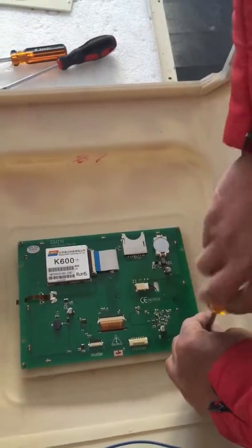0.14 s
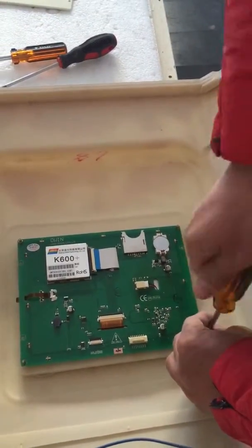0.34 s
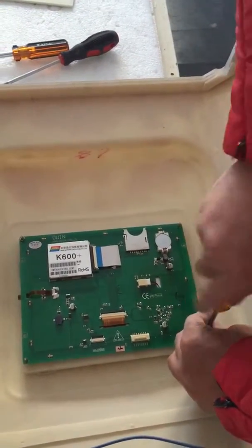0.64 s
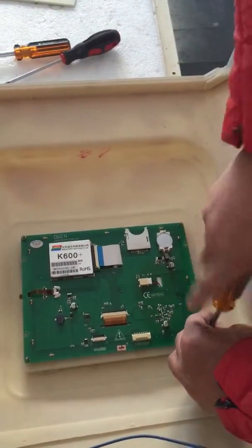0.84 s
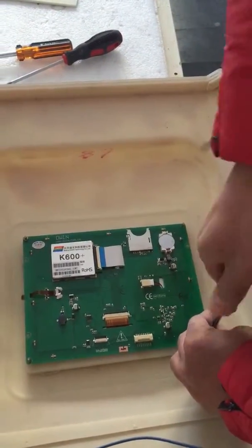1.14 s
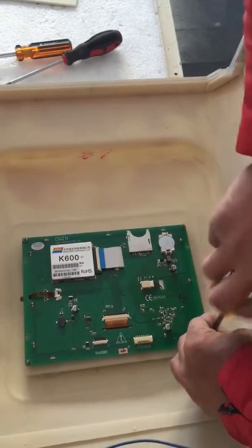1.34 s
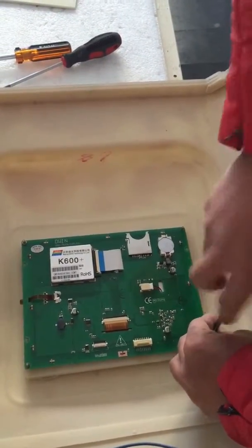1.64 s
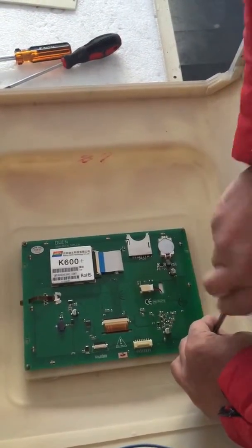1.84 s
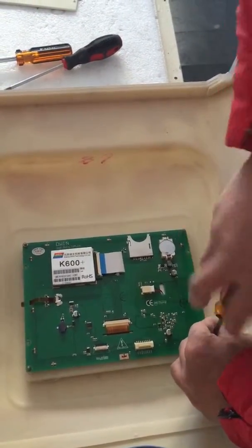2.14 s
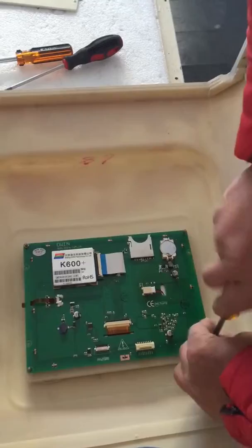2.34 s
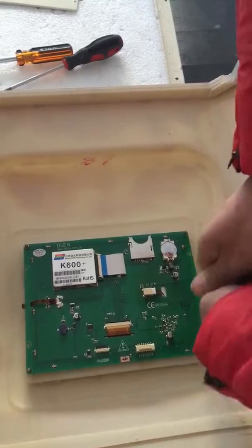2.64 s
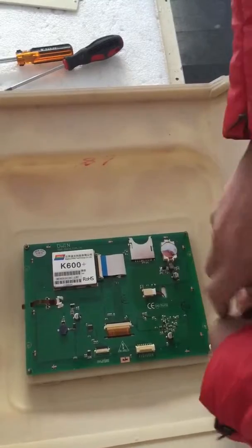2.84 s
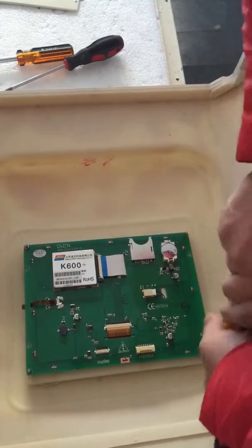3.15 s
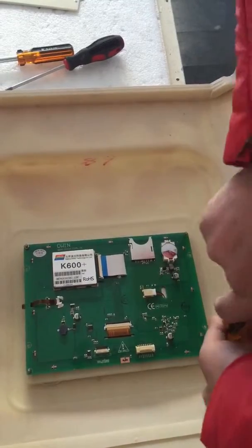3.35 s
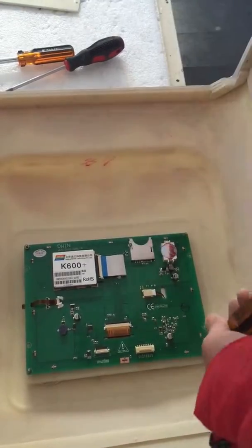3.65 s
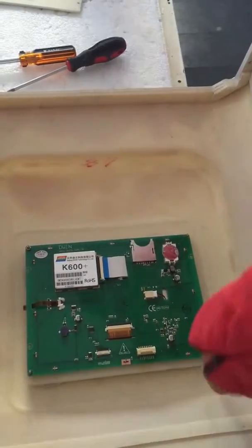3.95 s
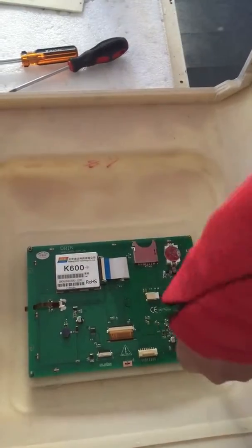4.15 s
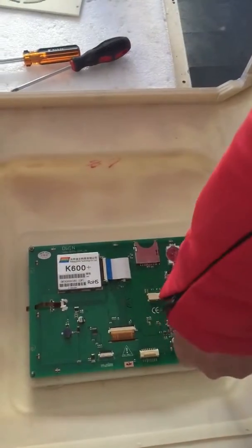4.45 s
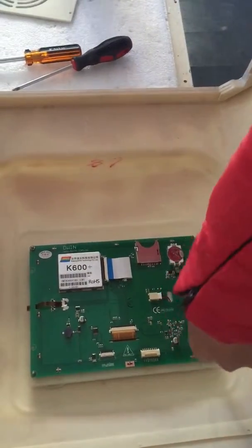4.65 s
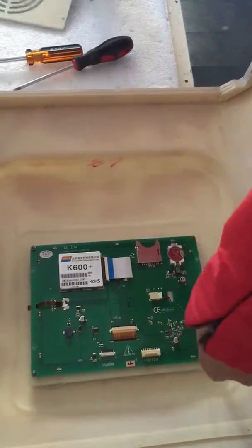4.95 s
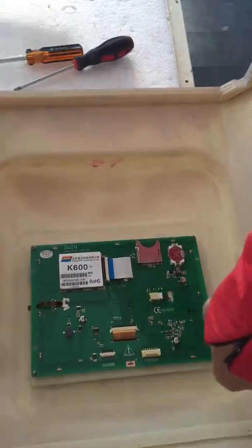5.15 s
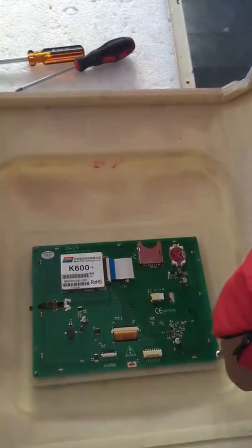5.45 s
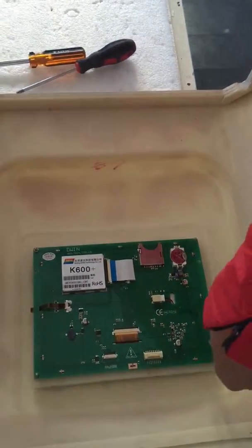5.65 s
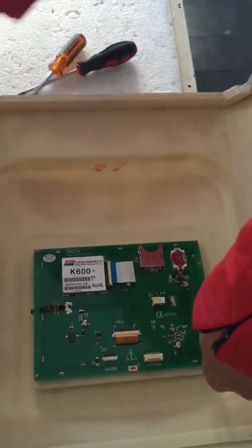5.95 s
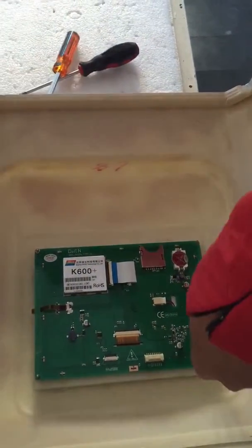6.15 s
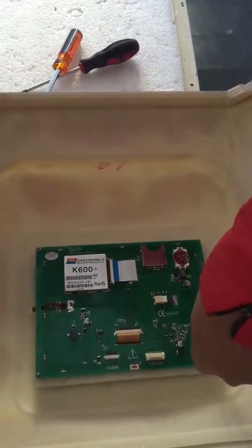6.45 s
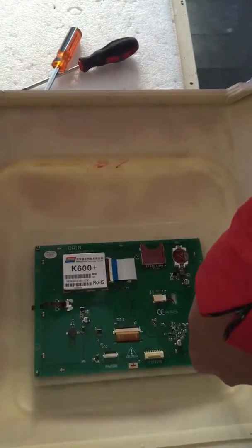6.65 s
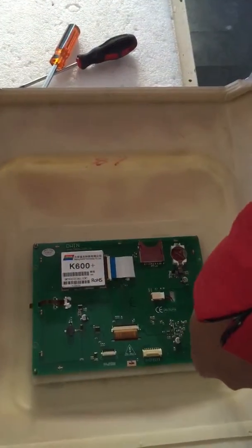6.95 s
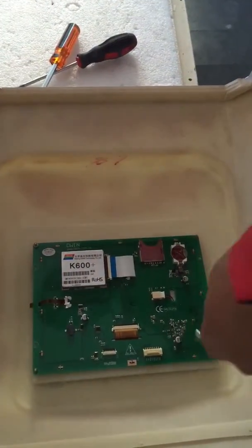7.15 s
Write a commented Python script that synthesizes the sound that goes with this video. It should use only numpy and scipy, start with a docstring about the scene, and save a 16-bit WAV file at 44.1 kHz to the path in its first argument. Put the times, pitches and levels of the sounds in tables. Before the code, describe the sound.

Dry, grainy finger strokes and tiny steel ticks come first, with soft rocking of a board in a hollow plastic tray, building to a loud knock. Cloth swishes follow, with a quick rising zip and small scrapes. A nudged tin rings and is stilled, heavy thuds shake the table, screwdrivers clink brightly, then quiet until a plastic handle is set down. Close microphone, small hard room, faint hiss.

```python
"""Fingers rub and roll a nut driver, made from noise full of tiny catches, while its socket ticks in short noise snaps.
Soon the board rocks and knocks on its plastic tray, as ringing tones and chatter, and the nut squeaks faintly.
Then a nylon sleeve swishes and zips over the tray's rim, something small scrapes, and the arm thuds on the table.
A nudged tin rings, harder thuds and ticks follow, steel tools clink, and at last a plastic handle clacks down.
All of it sits in a small hard room, over a faint steady rush of filtered noise."""
import sys
import numpy as np
from scipy import signal
from scipy.fft import rfft, irfft, next_fast_len
from scipy.io import wavfile
from scipy.ndimage import uniform_filter1d

SR = 44100
rng = np.random.default_rng(int(sys.argv[2]) if len(sys.argv) > 2 else 0)


def generate_wav(sig):
    """Save sig (samples, or channels by samples) to the path in sys.argv[1] as 16-bit PCM at SR."""
    pcm = np.round(np.clip(np.atleast_2d(sig).T, -1, 1) * 32767).astype(np.int16)
    wavfile.write(sys.argv[1], SR, pcm)


N = 321489
T = np.arange(SR // 2) / SR  # seconds since a contact, for half a second

# Levels in the tables are starting levels: the functions and the room shift them further.
# Tone colour of fingers rubbing the driver. Each row: frequency in Hz, level in dB.
FINGER_COLOUR = [(350, -28.5), (600, -4), (773, 2), (833, -4.5), (1140, 3.5), (1410, -0.5), (2220, 1.5),
                 (3890, -7.5), (4240, -6), (4810, -15.5), (7500, -22.5), (9750, -43), (16500, -120)]
# Tone colour of the tray rumbling under the fingers. Each row: frequency in Hz, level in dB.
TRAY_RUMBLE = [(40, -35.5), (90, -8.5), (140, -1), (200, -2), (300, 5.5), (400, -6), (550, 0.5), (700, -8),
               (1100, -38)]
# Tone colour of the hiss of a sliding contact. Each row: frequency in Hz, level in dB.
NYLON_HISS = [(3000, -27), (4500, 1), (5500, 0.5), (8000, -2.5), (10000, -4), (13000, -5), (16000, -10.5)]
# The fingers roll the driver or a part. Each row: time of the peak in seconds, length in seconds, level in dB.
TURNS = [(0, 0.2, -53), (0.26, 0.28, -53), (0.367, 0.12, -44.5), (0.49, 0.024, -49.5), (0.748, 0.14, -46),
         (0.823, 0.025, -45), (.885, 0.046, -45.5), (0.994, 0.11, -54.5), (1.158, 0.065, -40),
         (1.215, 0.071, -48.5), (1.531, 0.054, -53), (1.65, 0.084, -61), (1.897, 0.093, -51),
         (1.987, 0.14, -49.5), (2.405, 0.15, -55), (2.57, 0.12, -34), (3.142, 0.094, -49.5),
         (6.277, 0.14, -50.5), (7.064, 0.074, -51), (7.189, 0.24, -42.5)]
# Short strokes with a sharp start; the one at 2.86 is the tray rumbling on after the knocks.
# Each row: time of the peak in seconds, level in dB, hiss in dB against that level.
SHORT_STROKES = [(.075, -45, -10), (1.059, -42, -4.5), (1.154, -43, -1), (2.251, -44.5, 0),
                 (2.493, -43.5, -8), (2.584, -38.5, 0.5), (2.86, -56.5, -1.5), (6.653, -56, -13)]
TURN_RISE = 0.45  # share of a turn spent swelling
STROKE_RISE_S, STROKE_FALL_S = 0.0083, 0.043
# Pressing harder adds hiss and rumble: dB against the rub at a usual touch, and dB gained per dB of rub
USUAL_DB, HISS_DB, HISS_GROWS, RUMBLE_DB, RUMBLE_GROWS = -53.5, -14.5, 0.98, -3.5, 0.99

# Tone colour of the sleeve's cloth. Each row: frequency in Hz, level in dB.
CLOTH_COLOUR = [(350, -23.5), (600, -5), (1110, -2.5), (1310, -4.5), (1880, 3.5), (3120, -2), (3810, -3.5),
                (5070, -13), (5820, -9), (7500, -20), (9750, -44.5), (16500, -120)]
# Tone colour of the tray rumbling under the arm. Each row: frequency in Hz, level in dB.
RIM_RUMBLE = [(25, -28), (50, 3.5), (90, -3.5), (160, -6.5), (300, -8), (420, -10.5), (650, -16.5),
              (1100, -27.5)]
# Drags of the sleeve over the tray's rim, one curve each.
# Each row of a curve: time in seconds, level of the rub in dB, level of the hiss in dB.
DRAGS = [
    [(3.44, -68, -73), (3.454, -75, -76), (3.49, -59, -64), (3.6, -43.5, -37), (3.646, -40.5, -44),
     (3.668, -51.5, -61), (3.766, -59.5, -73), (3.844, -50, -59), (3.85, -52, -48.5), (3.922, -74, -81),
     (3.95, -58, -78)],
    [(4.14, -52, -67), (4.166, -77, -72), (4.176, -50, -63), (4.242, -47, -49.5), (4.434, -51, -62),
     (4.512, -64.5, -65), (4.522, -50, -52), (4.558, -60, -63.5), (4.646, -50.5, -52), (4.738, -78, -84),
     (4.77, -72, -79)],
    [(4.78, -83, -89), (4.796, -56.5, -69), (4.812, -63.5, -78), (4.852, -45, -51.5), (4.886, -57, -63),
     (4.932, -47, -48), (4.976, -57, -64), (5.004, -44, -44.5), (5.222, -73, -70.5), (5.296, -53.5, -78),
     (5.44, -50.5, -60)],
    [(5.69, -65, -97), (5.704, -51, -46), (5.742, -42, -42.5), (5.756, -49.5, -48), (5.786, -51, -54),
     (5.796, -45, -47), (5.844, -54.5, -56), (5.922, -48, -55), (5.94, -41, -47), (6.01, -48, -55.5),
     (6.02, -43, -44)],
    [(6.05, -44, -52), (6.074, -51, -51.5), (6.088, -42.5, -47), (6.102, -48, -49), (6.122, -55, -55),
     (6.202, -58.5, -66), (6.272, -55, -77), (6.36, -64, -73), (6.412, -55, -58.5), (6.576, -72.5, -79),
     (6.62, -80, -85.5)],
]
CLOTH_DB, NYLON_DB = 1, 0.5  # added to the rub and the hiss of every drag
RIM_DB, RIM_GROWS = -7, 0.54  # rim rumble against the rub at a usual touch, and dB gained per dB of rub

# The weave zips, mostly higher as the sleeve speeds up. Each row: time in seconds, pitch in Hz, level in dB.
ZIP = [(3.53, 3270, -70), (3.575, 3496, -46), (3.61, 3820, -37), (3.635, 4780, -43), (3.675, 4500, -66)]
# Something small scrapes along the table. Each row: time in seconds, pitch in Hz, level in dB.
SCRAPE = [(4.4, 900, -68), (4.437, 970, -47), (4.455, 1050, -54), (4.512, 1100, -55), (4.527, 1230, -45),
          (4.55, 1400, -56), (4.68, 1050, -68)]
# The nut squeaks faintly in its thread. Each row: time in seconds, pitch in Hz, level in dB.
SQUEAK = [(2.15, 2100, -74), (2.2, 2120, -59), (2.24, 2125, -67)]

# The board knocks on the tray.
# Each row: start in seconds, level in dB, crack in dB against that level, cut-off of the contact in Hz.
KNOCKS = [(1.467, -37.5, -8.5, 3000), (1.751, -29, -25, 1300), (2.010, -35.5, -1.5, 6000),
          (2.481, -30.5, -4, 4000), (2.532, -23.5, -11.5, 3000), (2.6702, -10, -17, 4570),
          (2.769, -13, -20.5, 3500)]
# Ringing tones of the board. Each row: frequency in Hz, width in Hz before the extra fade, level in dB.
BOARD = [(665, 120, -12.5), (1285, 73, -2), (1400, 21, -27.5), (1650, 21, -12.5), (1875, 53, -1),
         (2300, 25, -22), (2480, 29, -11), (2760, 75, -7.5), (3396, 73, -14.5), (3910, 87, -18)]
# Tone colour of the board's chatter. Each row: frequency in Hz, level in dB.
CHATTER = [(100, -42.5), (400, 0), (650, -9), (1250, 5), (1900, -6), (3000, -13.5), (5000, -25), (9000, -46.5)]
# Tone colour of a crack. Each row: frequency in Hz, level in dB.
CRACK = [(100, -55.5), (400, -21.5), (1000, 5), (2500, 5), (5000, 1.5), (9000, -10), (13000, -17),
         (16000, -13)]
# Ringing tones of the tray. Each row: frequency in Hz, level in dB, time to fall 60 dB in seconds.
TRAY = [(131.3, -12.5, 0.27), (260, 10, 0.077), (290, -2.5, 0.097), (320.3, -7, 0.46), (540, -13, 0.11)]
SHUDDER_DB, SHUDDER_T60 = -28, 0.53  # the tray shudders on: dB against a knock, seconds to fall 60 dB

# The board rocks on the tray as the nut is turned. Each row: start in seconds, level in dB.
ROCKS = [(1.440, -35.5), (1.843, -33.5), (1.93, -39.5), (2.142, -43.5), (2.316, -36.5), (2.394, -32.5),
         (3.14, -40), (4.91, -38)]
ROCK_HZ, ROCK_T60 = 533, 0.053  # pitch, and base decay time in seconds that swing() scales
ROCK_TAP_DB = -6  # rocking hardly taps: the board never leaves the tray
# Soft bumps on the tray, the last one from the handle set down.
# Each row: start in seconds, level in dB, pitch in Hz.
BUMPS = [(.390, -30.5, 290), (.645, -35.5, 313), (1.431, -31.5, 225), (2.531, -31, 218),
         (3.655, -32.5, 151), (7.09, -29.5, 298)]
# The arm thuds on the table. Each row: start in seconds, level in dB, pitch in Hz.
THUDS = [(4.705, -41, 124), (4.819, -36, 125), (5.018, -42, 76), (5.707, -18, 169), (5.945, -15.5, 175),
         (5.989, -14, 293), (6.001, -17, 250), (6.051, -23.5, 262)]
BUMP_CYCLES = 8.9  # base decay time counted in swings, scaled in swing()
BUMP_SHUDDER_DB, THUD_SHUDDER_DB = -15.5, -30  # the tray shudders less when the blow lands beside it
TABLE_DB, TABLE_HZ, TABLE_T60 = -20, 115, 0.65  # the table top drones on after a thud

# Small steel contacts of socket, nut and screws.
# Each row: start in seconds, level in dB, mid-range in dB against the bright snap.
TICKS = [(.3446, -39, -1), (1.0685, -37, 2.5), (1.434, -33, -28), (1.8374, -40, -2), (1.8645, -43, -18),
         (2.1394, -45.5, -2.5), (2.3903, -38, -2), (2.4794, -36, -13), (2.7607, -36, 7),
         (3.8497, -33, -3.5), (4.121, -45, 6), (4.522, -38, -3), (5.7035, -21.5, -4.5), (5.756, -29, -2),
         (5.7928, -25, -26), (5.8054, -26, -11), (5.872, -33, -4), (6.651, -49.5, 4.5),
         (7.0853, -24.5, -2.5)]
# Tone colour of the bright snap. Each row: frequency in Hz, level in dB.
SNAP = [(2000, -34), (5000, -8), (8000, -3), (11500, 1.5), (16000, -7)]
# Tone colour of the part rattling beneath. Each row: frequency in Hz, level in dB.
PART = [(300, -34), (1000, -5.5), (2200, 0.5), (4000, -6.5), (8000, -16), (16000, -31)]

# Steel tools touch. Each row: start in seconds, level in dB, brightness in dB per octave.
CLINKS = [(6.031, -14, -11), (6.035, -11, 2), (6.096, -23, -5)]
# Ringing tones of the steel. Each row: frequency in Hz, level in dB, time to fall 60 dB in seconds
# (before the contact's own damping).
STEEL = [(3425, -7.5, .16), (4660, -22, .15), (5090, -4, 0.44), (5530, -1.5, 0.36), (7950, 8, 0.16),
         (8930, -2.5, 0.17), (11640, 1.5, 0.11), (11700, -15.5, .16)]
# Tone colour of the crack of steel. Each row: frequency in Hz, level in dB.
STEEL_CRACK = [(1000, -9), (3400, -5.5), (6500, -15.5), (8200, -5.5), (10000, -17), (11500, -4.5), (16000, -24)]
# Ringing tones of the parts tin. Each row: frequency in Hz, level in dB, time to fall 60 dB in seconds
# (before the hand stills it).
TIN = [(900, -11, .3), (1060, -5.5, 0.5), (1157, -7, 0.63), (1250, 6.5, 0.85), (1250, -9.5, 0.42),
       (1418, -5, .3), (2900, -8.5, 0.67), (3113, 4, 0.31), (3680, -11.5, 0.29), (4177, -24, .22)]
TIN_S, TIN_DB = 5.455, -25  # when the tin is nudged, and its level
TIN_DAMP_S = 0.16  # the hand closes on the tin and stills it
TIN_THUD_DB, TIN_THUD_HZ, TIN_THUD_T60 = -34, 130, 0.77  # the tin shakes the table; swing() scales the time
# Ringing tones of the plastic handle. Each row: frequency in Hz, level in dB, time to fall 60 dB in seconds.
HANDLE = [(560, -1, 0.12), (780, -8, 0.11), (1376, -3, 0.094), (1470, 1, 0.1), (1780, 1.5, 0.099),
          (1900, -14, 0.064), (2240, -15, .08), (3300, -19, .07), (3540, 2.5, 0.069), (5140, -8, 0.052)]
HANDLE_S, HANDLE_LEVEL_DB = 7.086, -17.5  # when the handle is set down, and its level

# How long the room rings. Each row: frequency in Hz, time to fall 60 dB in seconds.
ROOM = [(100, 0.91), (350, 0.46), (1200, 0.46), (4000, 0.28), (14000, 0.2)]
# Tone colour of the quiet rush. Each row: frequency in Hz, level in dB.
QUIET = [(15, -36.5), (25, 2), (127, 0.5), (476, -15), (560, -7), (641, -13), (1020, -12.5), (2410, -16.5),
         (4870, -23), (6380, -23), (10400, -28), (14400, -28.5), (16000, -34.5)]
TOP_HZ = 16000  # band limit of the microphone


def rubbing():
    """Fingers on the driver, the sleeve on the tray, and three slides that catch into a hoarse tone."""
    slides = rasp(ZIP, width_hz=380) + rasp(SCRAPE, width_hz=300) + rasp(SQUEAK, width_hz=90)
    return fingers() + sleeve() + slides


def fingers():
    """Rumble and the hiss of turns follow how hard the fingers press; each short stroke has its own hiss."""
    turns = [db + swell(s, TURN_RISE * length, (1 - TURN_RISE) * length) for s, length, db in TURNS]
    strokes = [db + swell(s, STROKE_RISE_S, STROKE_FALL_S) for s, db, _ in SHORT_STROKES]
    stroke_hiss = together([level + hiss_db for level, (_, _, hiss_db) in zip(strokes, SHORT_STROKES)])
    turn_hiss = follows(together(turns), HISS_DB, HISS_GROWS)
    rub = together(turns + strokes)
    rumble = follows(rub, RUMBLE_DB, RUMBLE_GROWS)
    return contact(rub, np.hypot(turn_hiss, stroke_hiss), rumble, FINGER_COLOUR, TRAY_RUMBLE)


def sleeve():
    """The sleeve drags on and on as the arm moves; the rim rumbles more under a harder drag."""
    seconds = np.arange(N) / SR
    rub, nylon = np.zeros(N), np.zeros(N)
    for drag in DRAGS:
        s, rub_db, hiss_db = np.transpose(drag)
        rub += amp(np.interp(seconds, s, rub_db, left=-200, right=-200) + CLOTH_DB)
        nylon += amp(np.interp(seconds, s, hiss_db, left=-200, right=-200) + NYLON_DB)
    return contact(rub, nylon, follows(rub, RIM_DB, RIM_GROWS), CLOTH_COLOUR, RIM_RUMBLE)


def contact(rub, nylon, rumble, rub_spectrum, rumble_spectrum):
    """A sliding contact rubs, hisses and shakes the tray."""
    rub_sound = rub * friction(rub_spectrum, grain_db=2.0, flutter_db=1.6)
    hiss_sound = nylon * friction(NYLON_HISS, grain_db=3.0, flutter_db=1.86)
    rumble_sound = rumble * friction(rumble_spectrum, grain_db=1.5, flutter_db=1.4)
    return rub_sound + hiss_sound + rumble_sound


def friction(spectrum, grain_db, flutter_db):
    """Countless tiny catches of uneven size, in clumps; their colour shifts as the contact point moves."""
    catches = rng.standard_normal(N) * amp(grain_db * wobble(1500) + flutter_db * wobble(70))
    z = signal.stft(catches, nperseg=512)[2]
    # a smooth random map over pitch and time lifts and dips the colour
    smooth_pitch = uniform_filter1d(rng.standard_normal(z.shape), size=5, axis=0)
    colour_map = unit(uniform_filter1d(smooth_pitch, size=11, axis=1))
    shifting = signal.istft(z * amp(2.3 * colour_map), nperseg=512)[1][:N]
    return coloured(shifting, spectrum)


def rasp(track, width_hz):
    """Nearly regular catches make a hoarse, broken tone whose pitch follows the sliding speed."""
    seconds = np.arange(N) / SR
    s, track_hz, track_db = np.transpose(track)
    hz = np.interp(seconds, s, track_hz, left=-120, right=-120)  # pitch outside the track is all but inaudible
    db = np.interp(seconds, s, track_db, left=-120, right=-120)
    phase = 2 * np.pi * np.cumsum(hz + width_hz / 2 * wobble(width_hz)) / SR
    return amp(db) * unit(wobble(width_hz) * amp(3 * wobble(60)) * np.sin(phase))


def swell(s, rise, fall):
    """Level of one stroke in dB: it climbs 10 dB in the rise time and drops 10 dB in the fall time."""
    t = np.arange(0, N, 128) / SR - s
    return -10 * ((np.maximum(-t, 0) / rise) ** 1.57 + (np.maximum(t, 0) / fall) ** 0.97)


def together(levels_db):
    """The joint gain of overlapping strokes, one value per sample."""
    gain = np.sqrt(np.sum(amp(levels_db) ** 2, axis=0))
    return np.interp(np.arange(N), np.arange(0, N, 128), gain)


def follows(rub, db, grows):
    """Gain of a layer that lies at db against the rub for a usual touch and grows with it."""
    return amp(USUAL_DB + db) * (rub / amp(USUAL_DB)) ** grows


def knocks():
    """The stiff board answers at once and chatters; the soft tray follows a moment later."""
    out = np.zeros(N)
    for s, db, crack_db, contact_hz in KNOCKS:
        modes = blow(filtered(1.0 * (T == 0), board_response) * fade(0.49))
        chatter = blow(coloured(hiss(), CHATTER) * (fade(0.061) + 0.099 * fade(0.16)))
        # a padded contact lasts longer and leaves the upper modes still
        b, a = signal.butter(2, contact_hz, fs=SR)
        body = signal.lfilter(b, a, amp(-5.5) * modes + amp(-3) * chatter)
        crack = amp(crack_db) * blow(coloured(hiss(), CRACK) * fade(0.024))
        tray = ring(TRAY, blur_hz=1.6) * (1 - fade(0.013)) ** 2
        add(out, s, amp(db) * (body + crack))
        add(out, s + 0.003, amp(db - 5.5) * tray)
        add(out, s, amp(db + SHUDDER_DB) * shudder())
    return out


def board_response(f):
    """Sum of the board's resonances, with neighbours pushing in opposite directions."""
    total = 0
    for k, (centre, width, db) in enumerate(BOARD):
        total = total + (-1) ** k * amp(db) * 1j * f * width / (centre ** 2 - f ** 2 + 1j * f * width)
    return total


def bumps():
    """Rocking keeps one pitch; a bump or thud decays over a set number of swings, then tray and table rumble."""
    out = np.zeros(N)
    for s, db in ROCKS:
        add(out, s, amp(db) * (swing(ROCK_HZ, ROCK_T60) + amp(ROCK_TAP_DB) * tap()))
    for s, db, hz in BUMPS:
        add(out, s, amp(db) * (swing(hz, BUMP_CYCLES / hz) + tap() + amp(BUMP_SHUDDER_DB) * shudder()))
    for s, db, hz in THUDS:
        drone = amp(TABLE_DB) * murmur(TABLE_HZ) * fade(TABLE_T60) + amp(THUD_SHUDDER_DB) * shudder()
        add(out, s, amp(db) * (swing(hz, BUMP_CYCLES / hz) + tap() + drone))
    add(out, TIN_S, amp(TIN_THUD_DB) * swing(TIN_THUD_HZ, TIN_THUD_T60))
    return out


def swing(hz, t60):
    """A padded push swings a panel; neighbouring modes rumble on."""
    tone = np.sin(2 * np.pi * hz * T) * fade(0.73 * t60)
    neighbours = 0.27 * murmur(hz) * fade(1.79 * t60)
    return (tone + neighbours) * (1 - fade(0.0079))  # soft start


def murmur(hz):
    """Crowded panel modes around one pitch, rms 1."""
    def band(f):
        """Let through the band around the pitch."""
        low_pass = 1 / (1 + (f / (1.5 * hz)) ** 4)
        high_pass = f ** 3 / (f ** 3 + (0.6 * hz) ** 3)
        return low_pass * high_pass
    return unit(filtered(hiss(), band))


def tap():
    """The dull tap of a padded contact."""
    return 0.14 * blow(coloured(hiss(), CRACK, tilt_db=-10.5) * fade(0.068))


def shudder():
    """The soft tray rumbles on after a blow."""
    return coloured(hiss(), TRAY_RUMBLE) * fade(SHUDDER_T60)


def ticks():
    """Tiny steel contacts: a bright snap and a short rattle of the part beneath."""
    out = np.zeros(N)
    for s, db, mid_db in TICKS:
        bright = coloured(hiss(), SNAP) * fade(0.019)
        rattle = amp(mid_db) * coloured(hiss(), PART) * fade(0.04)
        add(out, s, amp(db - 3) * (bright + rattle) * (1 - fade(0.0059)))
    return out


def clinks():
    """Steel shafts clink: each blow cracks and rings."""
    out = np.zeros(N)
    damping = 0.24 + fade(0.054)  # the contact soaks up most of the ring at once
    for s, db, tilt_db in CLINKS:
        crack = blow(coloured(hiss(), STEEL_CRACK, tilt_db) * fade(0.077))
        ringing = blow(ring(STEEL, blur_hz=140, tilt_db=tilt_db) * damping)
        add(out, s, amp(db - 5.5) * (ringing + 0.52 * crack))
    return out


def tin():
    """The nudged tin scrapes and rings until the hand stills it."""
    out = np.zeros(N)
    scrape = blow(coloured(hiss(), CRACK, tilt_db=-4) * fade(0.41))
    ringing = ring(TIN, blur_hz=30) * np.exp(-(T / TIN_DAMP_S) ** 2)
    add(out, TIN_S, amp(TIN_DB) * (0.77 * ringing + 0.62 * scrape) * (1 - fade(0.0044)))
    return out


def handle():
    """A plastic handle clacks down: a short crack with quickly damped tones."""
    out = np.zeros(N)
    crack = blow(coloured(hiss(), CRACK) * fade(0.056))
    add(out, HANDLE_S, amp(HANDLE_LEVEL_DB) * (0.95 * ring(HANDLE, blur_hz=14) + 0.34 * crack))
    return out


def ring(modes, blur_hz, tilt_db=0):
    """Damped modes; a part that chatters on its support keeps jolting their phase, which widens each line."""
    hz, db, t60 = np.transpose(modes)[:, :, None]
    gain = amp(db + tilt_db * np.log2(hz / hz[0]) + rng.standard_normal(hz.shape))
    jolts = np.cumsum(rng.standard_normal((len(modes), len(T))), axis=1) * np.sqrt(2 * np.pi * blur_hz / SR)
    phase = 2 * np.pi * (hz * T + rng.random(hz.shape)) + jolts
    return blow(np.sum(gain * amp(-60 * T / t60) * np.sin(phase), axis=0))


def room(x, early_db, tail_db):
    """Tray walls and table top reflect within milliseconds; the room dies away more slowly."""
    hz, t, z = signal.stft(rng.standard_normal(SR), SR, nperseg=256)
    decay = amp(-60 * t / along(ROOM, hz)[:, None])
    tail = signal.istft(z * decay, SR, nperseg=256)[1][:len(T)] * (1 - fade(0.06))
    early = hiss() * fade(0.04) * (T > 0.002)
    answer = amp(early_db) * early / np.linalg.norm(early) + amp(tail_db) * tail / np.linalg.norm(tail)
    return x + signal.fftconvolve(x, answer)[:N]


def quiet_rush():
    """The faint rush of the room: steady noise with its own tone colour."""
    return amp(-64.5) * coloured(rng.standard_normal(N), QUIET)


def amp(db):
    """Decibels to gain."""
    return 10 ** (np.asarray(db) / 20)


def unit(x):
    """Scale to rms 1."""
    return x / np.sqrt(np.mean(x ** 2) + 1e-20)


def blow(x):
    """Scale a hit so that its first 12 ms peak near 1."""
    return x / (3 * np.sqrt(np.mean(x[T < 0.012] ** 2)))


def along(points, hz):
    """Read a curve of (Hz, value) points on a log frequency axis."""
    f, v = np.transpose(points)
    return np.interp(np.log(hz + 1), np.log(f), v)


def filtered(x, response):
    """Filter x by a response that depends on frequency."""
    m = next_fast_len(len(x) + 8192)
    return irfft(rfft(x, m) * response(np.fft.rfftfreq(m, 1 / SR)), m)[:len(x)]


def coloured(x, spectrum, tilt_db=0):
    """Shape x by a spectrum and a tilt per octave above the bass, rms 1."""
    return unit(filtered(x, lambda hz: amp(along(spectrum, hz) + tilt_db * np.log2(hz + 200))))


def fade(t60):
    """Exponential decay after a contact, falling 60 dB in t60 seconds."""
    return amp(-60 * T / t60)


def hiss():
    """Fresh white noise for one contact."""
    return rng.standard_normal(len(T))


def wobble(rate):
    """A random curve with rate knots a second, rms 1."""
    knots = rng.standard_normal(int(N * rate / SR) + 2)
    return unit(np.interp(np.arange(N) * rate / SR, np.arange(len(knots)), knots))


def add(track, s, sound):
    """Mix a sound into the track at time s."""
    part = track[round(s * SR):][:len(sound)]
    part += sound[:len(part)]


def scene():
    """Contacts and rubbing in the room, over its faint rush."""
    handling = amp(-1) * room(rubbing(), early_db=-6.5, tail_db=-15)
    board = room(knocks(), early_db=-14, tail_db=-16)
    soft = room(bumps(), early_db=-11.5, tail_db=-13)
    metal_and_handle = room(ticks() + clinks() + tin() + handle(), early_db=-14, tail_db=-16)
    return (handling + board + soft + metal_and_handle + quiet_rush())[None]


def record(dry):
    """The microphone sheds the deep bass and cuts off steeply at its band limit."""
    thin = signal.sosfilt(signal.butter(4, 45, "high", fs=SR, output="sos"), dry[0])
    return filtered(thin, lambda hz: 1 / np.sqrt(1 + (hz / TOP_HZ) ** 200))[None]


dry = scene()
out = record(dry)
generate_wav(out)
```